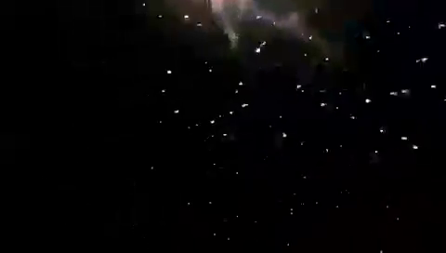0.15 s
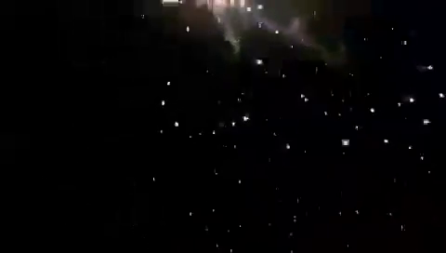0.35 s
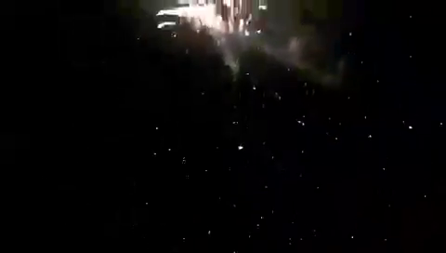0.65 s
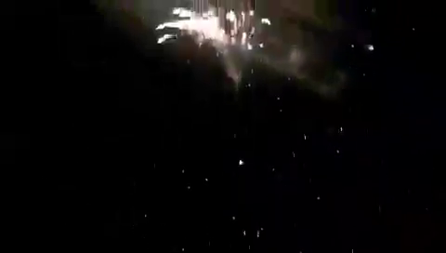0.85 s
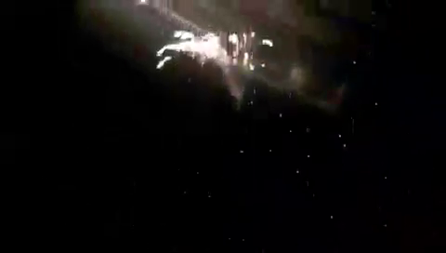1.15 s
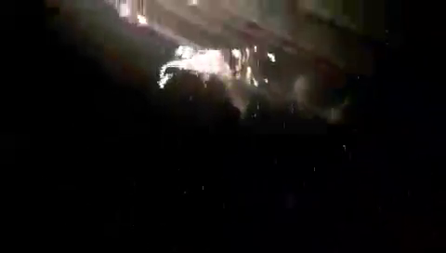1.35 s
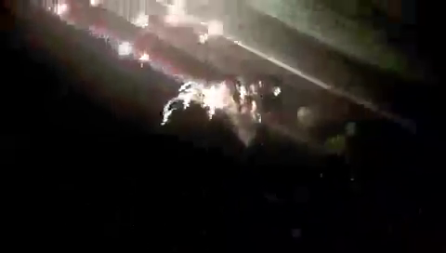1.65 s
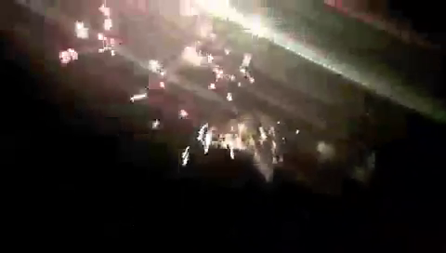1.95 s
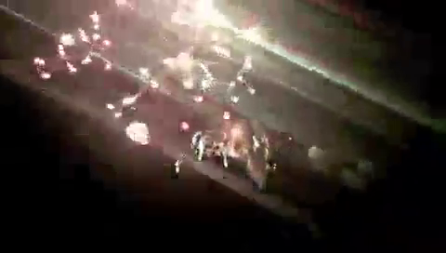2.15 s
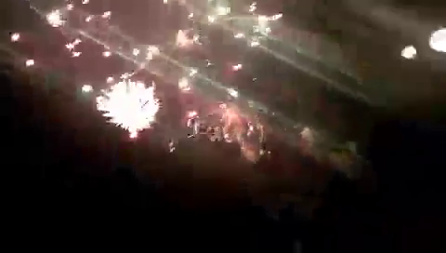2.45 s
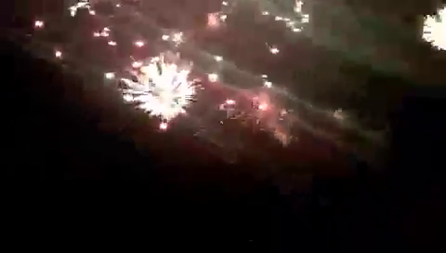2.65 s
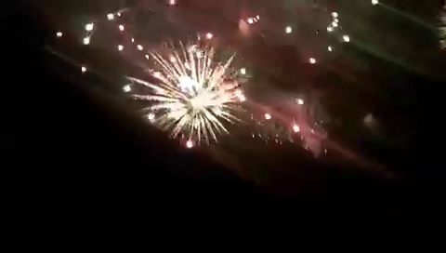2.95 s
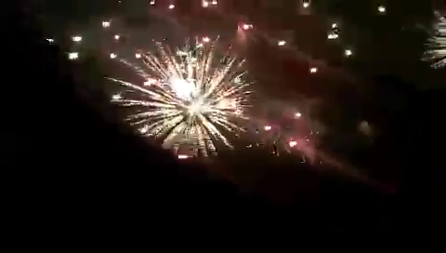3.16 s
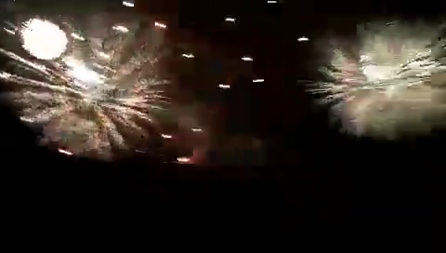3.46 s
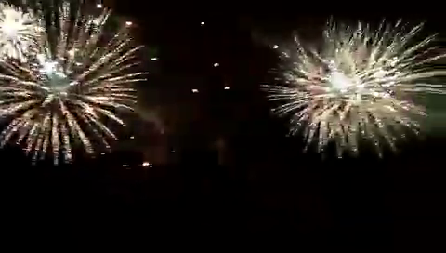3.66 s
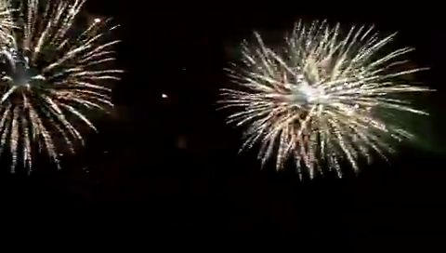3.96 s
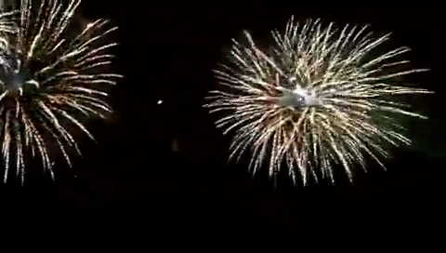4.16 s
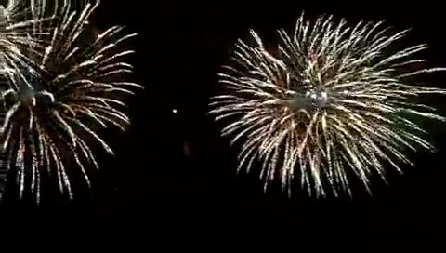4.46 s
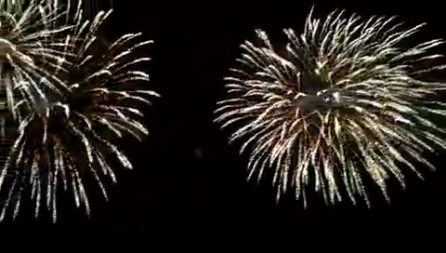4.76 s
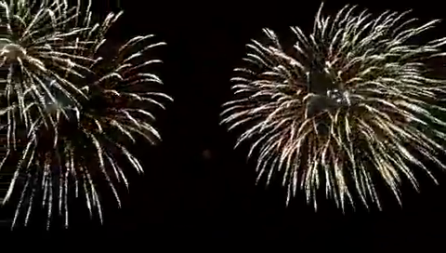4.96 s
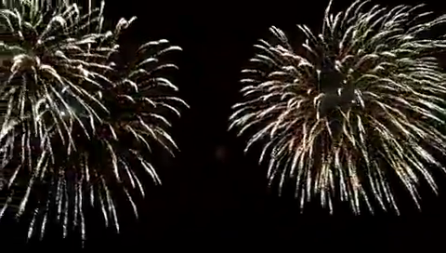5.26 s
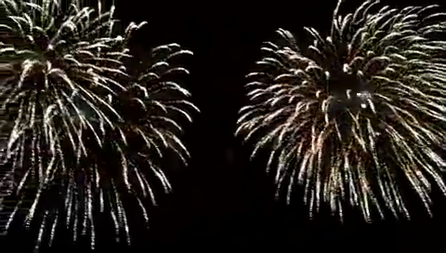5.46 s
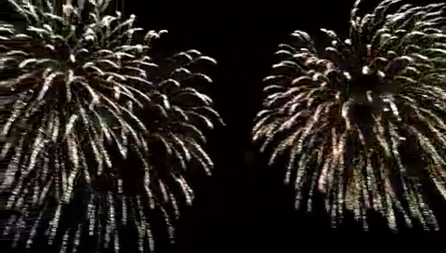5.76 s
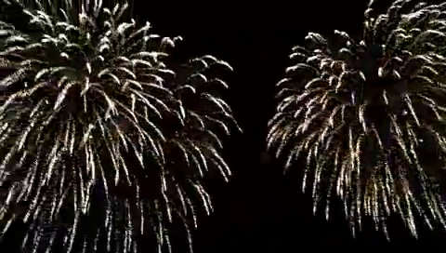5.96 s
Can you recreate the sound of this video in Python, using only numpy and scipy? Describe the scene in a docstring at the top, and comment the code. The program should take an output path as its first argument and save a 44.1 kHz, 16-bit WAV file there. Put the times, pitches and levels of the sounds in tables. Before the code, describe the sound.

Fireworks boom and crack in the open night air, with slapping echoes, over a low rumble and faintly trilling crickets.

```python
"""Crickets trill over a low rumble at night, then fireworks boom above open ground.
Every blast is one pulse of air pressure followed by its bounce off the ground. Large shells boom,
slap back twice from far surfaces and roll away; a volley of small shells cracks in between and fills
the air with a wash of echoes. It is all heard through a small microphone that the blasts overload."""
import sys
import numpy as np
from scipy import signal
from scipy.fft import rfft, irfft, next_fast_len
from scipy.io import wavfile

SR = 44100
rng = np.random.default_rng(int(sys.argv[2]) if len(sys.argv) > 2 else 0)


def pcm_store(signal):
    """Save signal as 16-bit PCM."""
    levels = np.round(np.clip(np.atleast_2d(signal), -1, 1) * 32767)
    wavfile.write(sys.argv[1], SR, levels.astype(np.int16).T)


N = 269010
TIME = np.arange(N) / SR

# how the low rumble rises and falls: t/s, level/dB
RUMBLE_LEVELS = [(0.0, -35.5), (0.59, -34.5), (2.75, -39.5), (3.09, -41), (4.99, -38.5), (5.25, -43),
                 (5.42, -39.5), (5.66, -37.5), (6.1, -36.5)]
# tone of the rumble: f/Hz, level/dB
RUMBLE_TONE = [(12, -4.5), (25, -2), (45, 2), (70, -1.5), (110, -8), (200, -16), (400, -28.5),
               (1500, -68.5)]
# tone of the open air and the wash: f/Hz, level/dB
AIR_TONE = [(100, 3.5), (250, 3.5), (500, 3.5), (1000, -2), (2000, -12), (3000, -5.5), (3400, -11),
            (3800, -17), (4700, -17), (5500, -16.5), (9000, -13.5), (16000, -23)]
# a shell whose wash is still dying away at the start: t/s, level/dB
EARLY_SHELL = (-0.23, 8.6)
# trilling crickets: start/s, end/s, f/Hz, wing strokes/Hz, level/dB
TRILLS = [(0, 6.1, 3334, 40, -51), (0, 5.6, 3420, 57, -53), (1.05, 1.34, 4570, 96, -53.5),
          (1.66, 1.86, 4640, 66, -57)]
# brief soft hisses: start/s, end/s, level/dB
SOFT_HISSES = [(0.379, 0.46, -31), (1.848, 1.964, -25.5)]
# tone of the hisses: f/Hz, level/dB
HISS_TONE = [(1000, -18), (2500, -11.5), (4200, -9.5), (6500, 5.5), (9500, 12.5), (13000, 1), (15500, -4)]
# harsh rasps on and just before a boom: t/s (middle), level/dB, half length/s, roll/dB
HARSH_RASPS = [(5.119, -45, .005, -22), (5.16, -31.5, 0.0017, 3), (5.181, -33, .002, -11),
               (5.267, -6, 0.0046, -10)]
# tone of the rasps: f/Hz, level/dB
RASP_TONE = [(200, 13.5), (450, 10), (750, 1.5), (1200, 12.5), (1450, 4), (1700, 6.5), (2500, 5.5),
             (3400, 7.5), (4000, 8.5), (4500, 3), (5000, 4.5), (6000, 2.5), (8000, -0.5), (16000, -3)]
# small shells (higher bursts bounce off the ground later): t/s, level/dB, push/ms, ground lag/ms
SMALL_SHELLS = [(2.025, 11, 0.43, 10.9), (2.2237, 7.5, .43, 11.6), (2.2532, 7, 0.3, 11),
                (2.271, 0.5, 0.37, 10.7), (2.433, 11.5, 0.34, 11.4), (2.5064, 6, 0.49, 10.5),
                (2.574, 7.5, 0.47, 11.7), (2.6096, -1.5, .37, 9.8), (2.614, 4, 0.46, 9.9),
                (2.6318, 3.5, 0.52, 10.6), (2.6532, -5.5, 0.54, 10.3), (2.6766, -1.5, 0.5, 10.3),
                (2.7192, 4, 0.23, 11.2), (2.7546, 4.5, 0.38, 11.6), (2.7981, 7.5, 0.4, 10.7),
                (2.8345, 10.5, 0.35, 9.3), (2.8583, 1.5, 0.25, 9.8), (3.0172, 1, .34, 9.5),
                (3.1408, 7, 0.31, 10), (3.2047, 6, 0.42, 11.4), (3.2785, 6, 0.32, 11),
                (3.4275, -1.5, .1, 10.5), (3.9918, 9, 0.39, 9.6), (5.493, -15, 0.21, 10.5)]
# tone of the sound scattered by nearby things: f/Hz, level/dB
SCATTER_TONE = [(100, 13.5), (400, 4), (900, 0), (2000, 3.5), (4000, 2), (7000, 5.5), (16000, -19)]
# large shells: t/s, level/dB, push/ms, suction/ms, echo delay/s, echo/dB, roll/dB
LARGE_SHELLS = [(0.178, -8.5, 22.7, 12, 0.13, -17, -17), (0.5069, 22, 0.82, 2.33, 0.17, -25, -17),
                (2.9588, 26.5, 0.64, 2.63, 0.12, -34, -23), (3.3223, 25, 0.75, 2.8, 0.16, -36, -22.5),
                (3.3884, 10, 0.95, 2.5, 0.13, -25, -18), (4.2007, 24.5, 0.585, 3.84, .1318, -25, -22.5),
                (5.158, -19, 1.95, 2.25, 0.022, -12, 1), (5.2669, 2.5, 6.4, 13, .153, -23, -11.5),
                (5.2679, 4, 1, 2.84, .05, -20.5, -21.5), (6.004, -15.5, 4.5, 3.8, .2, -20, -16)]
# tone of the rolling echoes: f/Hz, level/dB
ROLL_TONE = [(30, 15), (100, 11.5), (200, 4), (500, -4.5), (1200, -2), (2500, 1), (4000, 4), (6000, 8.5),
             (10000, 11), (16000, 8)]
# stereo width of the spread-out sound: f/Hz, level/dB (side against mid)
STEREO_WIDTH = [(60, -68), (250, -90), (500, -70), (1000, -114), (2000, -27), (4000, -6), (8000, -2),
                (14000, 7)]
# how the microphone rings: f/Hz, level/dB
MICROPHONE_TONE = [(20, -2), (60, 1), (500, -1.5), (1200, 0.5), (2100, 8.5), (3300, 14), (4200, 14),
                   (4900, 16.5), (5600, 20.5), (7000, 5), (10000, -2.5), (16000, 3)]
# tone of the electronics after the overload: f/Hz, level/dB
ELECTRONICS_TONE = [(4800, 0), (5500, -11), (6500, -8.5), (8000, -9.5), (9300, -4.5), (14000, -5)]

BOOM_GROUND_LAG_S, BOOM_GROUND_DB = 0.0099, -17.5   # a boom's bounce off the ground
SECOND_ECHO_S, SECOND_ECHO_DB = 0.059, -5.5   # a farther surface answers after the first echo
CREST_AFTER_ECHO_S = 0.0088   # the roll is strongest just after the first echo
THUMP_DB, THUMP_MS = -14, 17   # a deep, slow thump follows each boom
CRACK_GROUND_DB, SCATTER_DB = -4.5, -8   # ground bounce and scatter, relative to a crack
SCATTER_LOSS = 0.14   # nearer, louder cracks are drier: dB of scatter lost per dB of level


def from_db(db):
    """Turn decibels into a factor to multiply by."""
    return 10 ** (np.asarray(db) / 20)


def add(out, sound, s):
    """Mix a sound in, starting at s seconds."""
    start = int(np.clip(round(s * SR), 0, N - 1))
    out[..., start:start + sound.shape[-1]] += sound[..., :N - start]


def gate(start, end, edge_s):
    """A volume curve that is on between two times, with sloping edges."""
    return np.clip(np.minimum(TIME - start, end - TIME) / edge_s + .5, 0, 1)


def colour(x, points):
    """Shape the tone of a sound along a curve of f/Hz, level/dB points."""
    length = 2 * next_fast_len(x.shape[-1] // 2 + SR // 10)
    hz, db = np.transpose(points)
    grid_hz = np.maximum(np.arange(length // 2 + 1) * SR / length, 1)
    gain = from_db(np.interp(np.log(grid_hz), np.log(hz), db))
    # minimum phase: the filter rings only after a sound, never before it
    cepstrum = irfft(np.log(gain))
    cepstrum[1:length // 2] *= 2
    cepstrum[length // 2 + 1:] = 0
    return irfft(rfft(x, length) * np.exp(rfft(cepstrum)))[..., :x.shape[-1]]


def noise(points):
    """Two unrelated noises of strength 1: mid (the centre) and side (the stereo width)."""
    x = colour(rng.standard_normal((2, N)), points)
    return x / x.std()


def blast(level_db, push_ms, suction_ms, blunt_ms=5):
    """A shock front: the air pushes, eases off, then sucks back as much as it pushed."""
    ms = np.arange(int((push_ms + suction_ms) * SR / 1000) + 2) * 1000 / SR
    rise_ms = (push_ms / blunt_ms) ** 2   # long, distant pulses have blunter fronts
    push = np.maximum(1 - ms / push_ms, 0) * (1 - np.exp(-ms / rise_ms))
    suction = np.sin(np.pi * np.clip((ms - push_ms) / suction_ms, 0, 1))
    return from_db(level_db) * (suction * push.sum() / suction.sum() - push)


def reflections(pulse, envelope, uneven_db):
    """Countless surfaces of uneven size return a pulse (mid and side), sharing out its energy."""
    returns, sizes = rng.standard_normal((2, 2, len(envelope)))
    returns = returns * from_db(uneven_db * np.clip(sizes, -2, 2)) * envelope
    returns /= np.sqrt(np.sum(returns ** 2, axis=1, keepdims=True))
    return signal.fftconvolve(returns, pulse[None], axes=1)


def rolling(crest_s, early_share=0.42, swell_s=0.017, fade_s=0.095, linger_db=-24, linger_s=0.91):
    """Volume curve of the echoes from all around: they swell to a crest, fade and linger."""
    t = TIME[:2 * SR]
    before, after = np.maximum(crest_s - t, 0), np.maximum(t - crest_s, 0)
    swell = early_share + (1 - early_share) * np.exp(-before / swell_s)
    return swell * (np.exp(-after / fade_s) + from_db(linger_db) * np.exp(-after / linger_s))


def rumble(gain_db=3.5):
    """A low noise that slowly rises and falls."""
    level_db = np.interp(TIME, *np.transpose(RUMBLE_LEVELS))
    return from_db(gain_db + level_db) * noise(RUMBLE_TONE)


def air_and_wash(air_db=-45, wash_db=-47, crest_s=0.2):
    """Steady open air; the far echoes of each crack swell and die, piling up into a wash."""
    power = from_db(air_db) ** 2
    for s, level_db, *_ in [EARLY_SHELL, *SMALL_SHELLS]:
        age = np.maximum(TIME - s, 0) / crest_s
        power = power + (from_db(level_db + wash_db) * age * np.exp(1 - age)) ** 2
    return np.sqrt(power) * noise(AIR_TONE)


def crickets(fall=0.042, jitter=0.133, drift=0.013, edge_s=0.014):
    """Each wing stroke is a short tone that falls in pitch; strokes vary in pace, pitch and strength."""
    out = np.zeros(N)
    knots = np.linspace(0, TIME[-1], num=150)
    for start, end, hz, per_s, level_db in TRILLS:
        wander = rng.standard_normal((3, len(knots)))
        pace, detune, strength_db = (np.interp(TIME, knots, row) for row in wander)
        stroke = np.cumsum(per_s * (1 + jitter * pace)) / SR % 1   # runs from 0 to 1 in each stroke
        pitch = hz * (1 + fall * (.5 - stroke) + drift * detune)
        tone = np.sin(2 * np.pi * np.cumsum(pitch) / SR) * np.sin(np.pi * stroke) ** 2
        out += from_db(level_db + strength_db) * tone * gate(start, end, edge_s)
    return out


def hisses(edge_s=0.039):
    """Faint bright hisses that fade in and out."""
    volume = sum(from_db(db) * gate(start, end, edge_s) for start, end, db in SOFT_HISSES)
    return volume * noise(HISS_TONE)


def rasps(crest_s=0.22, fade_s=0.22, lumpy_db=5.5):
    """A few milliseconds of harsh noise ride on the front of a boom and roll away in uneven swells."""
    out = np.zeros((2, N))
    tail = rolling(crest_s, fade_s=fade_s)
    knots = np.linspace(0, len(tail), num=60)
    for s, level_db, half_s, roll_db in HARSH_RASPS:
        grit = from_db(level_db) * noise(RASP_TONE)
        age = TIME[:int(6 * half_s * SR)] / half_s - 3   # half lengths from the middle
        burst = np.exp(-age ** 2 / 2)
        lumps = np.interp(np.arange(len(tail)), knots, rng.standard_normal(len(knots)))
        swells = tail * from_db(lumpy_db * lumps)
        swells *= from_db(roll_db) * np.linalg.norm(burst) / np.linalg.norm(swells)
        add(out[0], burst * grit[0, -len(burst):], s + age[0] * half_s)
        add(out, swells * grit[:, :len(swells)], s)
    return out


def far_echoes(smear_db=-4, smear_s=0.021, stretch=0.99, bounce_db=-7, dull_hz=3400):
    """Two big, far surfaces throw each boom back as dull, smeared thuds, each with a ground bounce."""
    out = np.zeros((2, N))
    for s, level_db, push_ms, _, echo_s, echo_db, _ in LARGE_SHELLS:
        for later_s, weaker_db in ((0, 0), (SECOND_ECHO_S, SECOND_ECHO_DB)):
            arrival = s + echo_s + later_s
            pulse = blast(level_db + echo_db + weaker_db, stretch * push_ms, 2 * stretch * push_ms)
            smear = reflections(pulse, np.exp(-TIME[:SR // 8] / smear_s), uneven_db=5.5)
            add(out[0], pulse, arrival)
            add(out[0], from_db(bounce_db) * pulse, arrival + BOOM_GROUND_LAG_S)
            add(out, from_db(smear_db) * smear, arrival)
    return signal.sosfilt(signal.butter(1, dull_hz, fs=SR, output="sos"), out + 1e-18)


def small_shells(suction_ratio=1.82, snap_db=-18, snap_ms=0.17, snap_lag_s=0.0195,
                 near_s=0.0084, hold_db=-9, hold_s=0.11):
    """Cracks: the pulse, its ground bounce and scattered echoes that hold briefly, then drop away."""
    direct, scatter = np.zeros(N), np.zeros((2, N))
    t = TIME[:SR // 2]
    decay = np.exp(-t / near_s) + from_db(hold_db) * np.exp(-(t / hold_s) ** 2)
    for s, level_db, push_ms, lag_ms in SMALL_SHELLS:
        pulse = blast(level_db, push_ms, suction_ratio * push_ms)
        snap = blast(level_db + snap_db, snap_ms, snap_ms)   # a thin echo off a nearby surface
        add(direct, pulse, s)
        add(direct, from_db(CRACK_GROUND_DB) * pulse, s + lag_ms / 1000)
        add(direct, snap, s + snap_lag_s)
        scatter_db = SCATTER_DB - SCATTER_LOSS * level_db
        add(scatter, from_db(scatter_db) * reflections(pulse, decay, uneven_db=9.5), s)
    return direct, colour(scatter, SCATTER_TONE)


def large_shells(near_db=-25, near_s=0.016):
    """Booms: the pulse, a deep, slow thump after it, the ground bounce, near echoes, a roll."""
    direct, roll = np.zeros(N), np.zeros((2, N))
    near_decay = np.exp(-TIME[:SR // 2] / near_s)
    for s, level_db, push_ms, suction_ms, echo_s, _, roll_db in LARGE_SHELLS:
        pulse = blast(level_db, push_ms, suction_ms)
        thump = blast(level_db + THUMP_DB, THUMP_MS, 2 * THUMP_MS)
        add(direct, pulse, s)
        add(direct, suction_ms / THUMP_MS * thump, s + len(pulse) / SR)   # stronger after a long suction
        add(direct, from_db(BOOM_GROUND_DB) * pulse, s + BOOM_GROUND_LAG_S)
        swell = rolling(echo_s + CREST_AFTER_ECHO_S)
        add(roll, from_db(roll_db) * reflections(pulse, swell, uneven_db=11.0), s)
        add(roll, from_db(near_db) * reflections(pulse, near_decay, uneven_db=7.5), s)
    return direct, colour(roll, ROLL_TONE)


def microphone_ports(x, lag_ms=0.0072):
    """The microphone's two openings hear the same sound a tiny moment apart, the left one later."""
    length = 2 * next_fast_len(N // 2 + SR // 10)
    hz = np.arange(length // 2 + 1) * SR / length
    lag_s = np.array([[.5], [-.5]]) * lag_ms / 1000
    return irfft(rfft(x, length) * np.exp(-2j * np.pi * hz * lag_s))[:, :N]


def scene(width_db=-3):
    """Blasts arrive near the centre; only the treble of the echoes and noises has some width."""
    booms, roll = large_shells()
    cracks, scatter = small_shells()
    mid, side = roll + scatter + far_echoes() + rasps() + hisses() + rumble() + air_and_wash()
    side = from_db(width_db) * colour(side, STEREO_WIDTH)
    return microphone_ports(booms + cracks + crickets() + mid) + np.array([side, -side])


def record(dry, average_samples=16, ceiling=0.88, hardness=7, low_cut_hz=12, high_cut_hz=16200):
    """The microphone rings in the treble, has a row of dips in its tone and overloads on near blasts."""
    notched = signal.lfilter(np.ones(average_samples) / average_samples, [1], dry)
    ringing = colour(notched, MICROPHONE_TONE)
    clipped = ringing / (1 + np.abs(ringing / ceiling) ** hardness) ** (1 / hardness)
    softened = colour(clipped, ELECTRONICS_TONE)
    low_cut = signal.butter(1, low_cut_hz, "high", fs=SR, output="sos")
    high_cut = signal.ellip(10, .2, 80, high_cut_hz, fs=SR, output="sos")
    return signal.sosfilt(high_cut, signal.sosfilt(low_cut, softened))


dry = scene()
out = record(dry)
pcm_store(out)
```